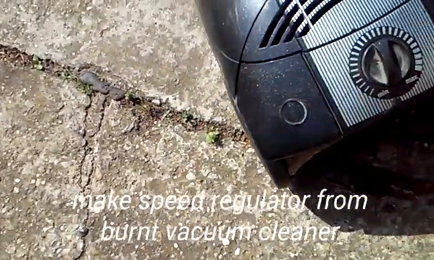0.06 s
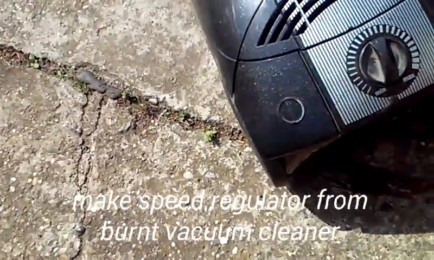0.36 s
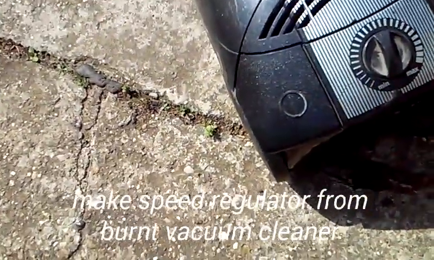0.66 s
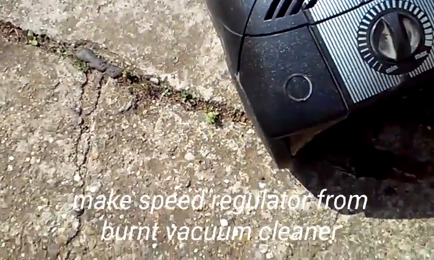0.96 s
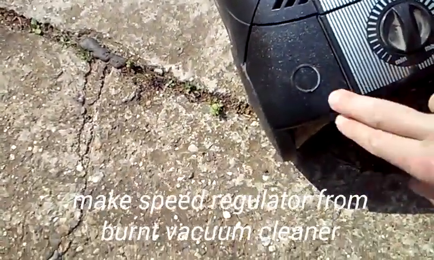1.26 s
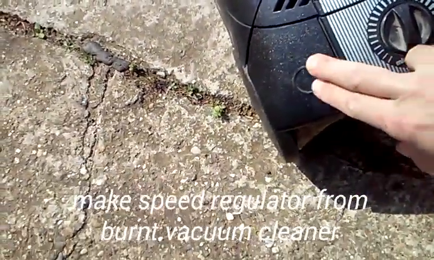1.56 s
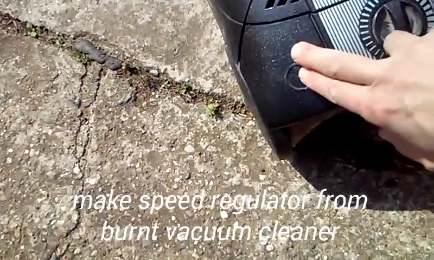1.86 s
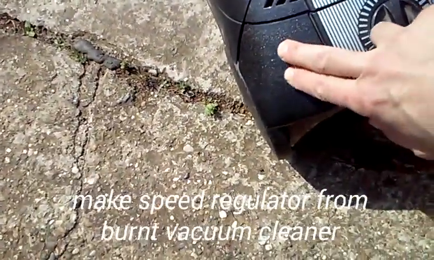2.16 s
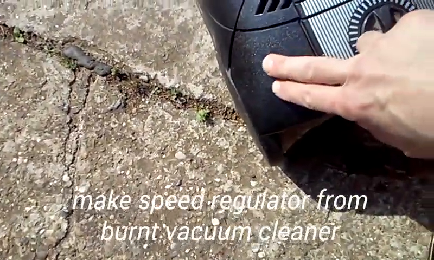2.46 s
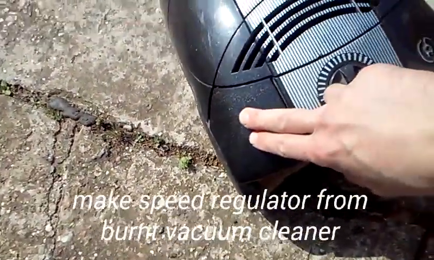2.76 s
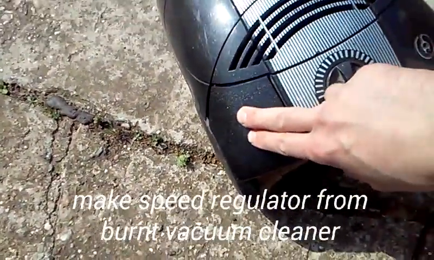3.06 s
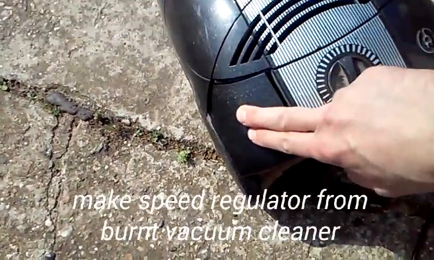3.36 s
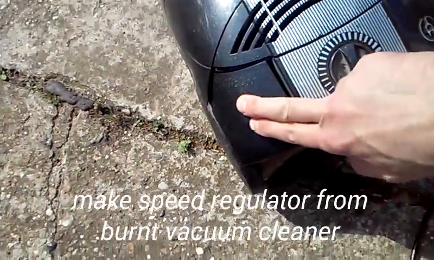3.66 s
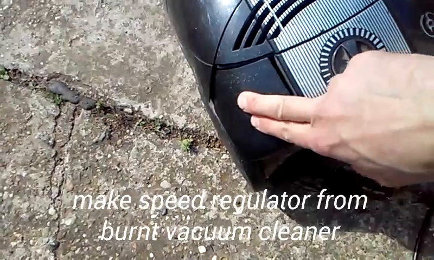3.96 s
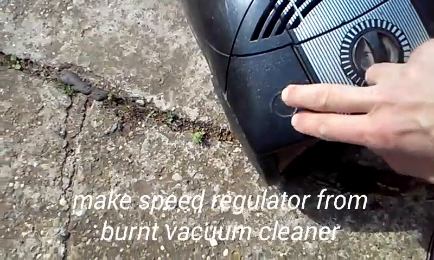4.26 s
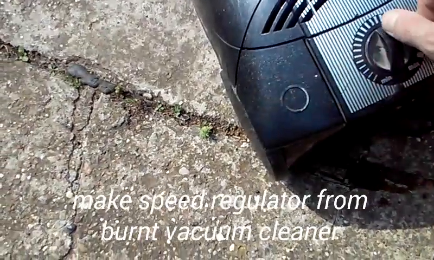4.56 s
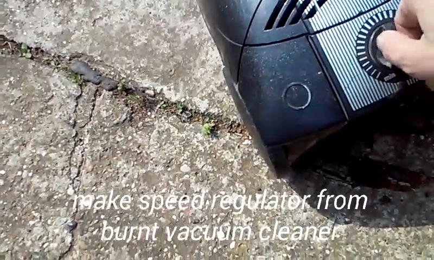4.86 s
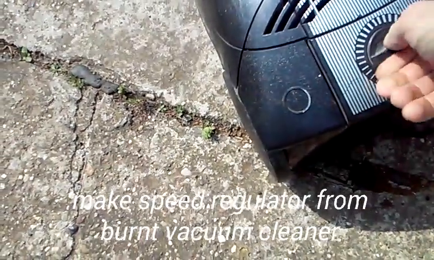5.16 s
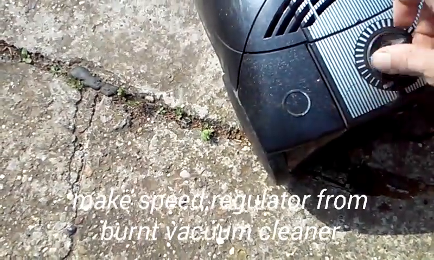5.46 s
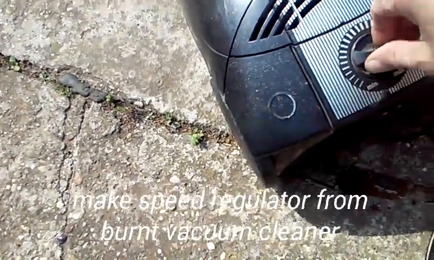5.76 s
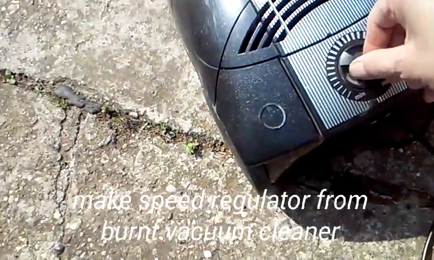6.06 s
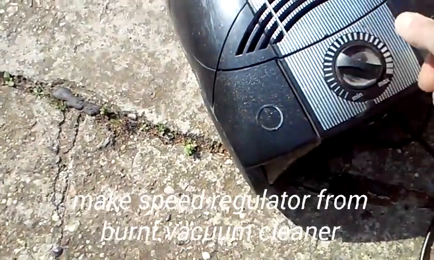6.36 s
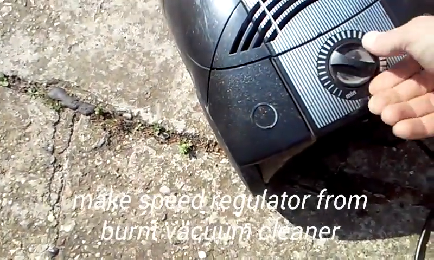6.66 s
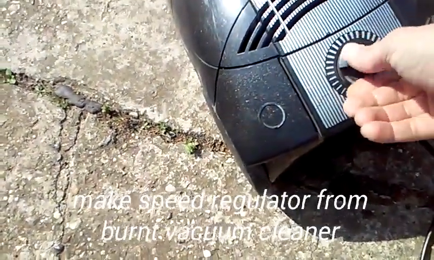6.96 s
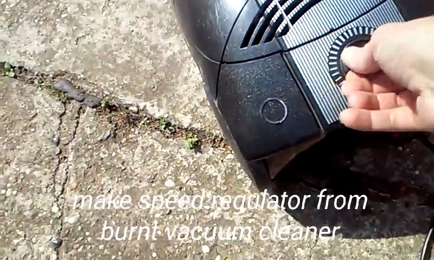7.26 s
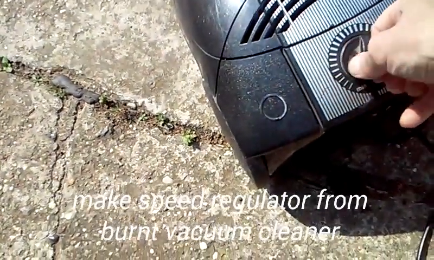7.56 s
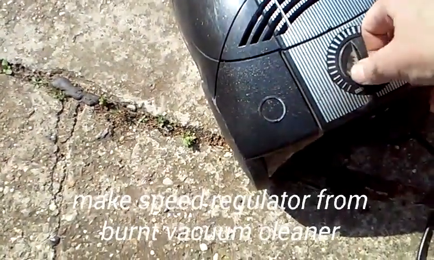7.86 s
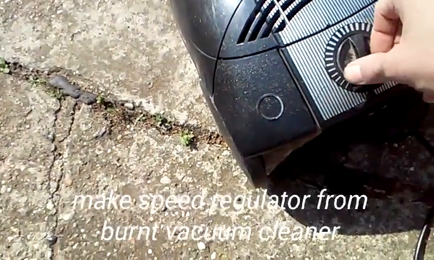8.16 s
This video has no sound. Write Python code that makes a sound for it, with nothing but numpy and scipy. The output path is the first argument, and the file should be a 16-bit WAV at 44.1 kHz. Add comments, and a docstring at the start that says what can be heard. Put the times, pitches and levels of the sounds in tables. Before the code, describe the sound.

An angle grinder with no load coasts down close by, its worn gears and bearings rattling more slowly and quietly, with brief squeaks and a run of knocks. As it nearly stops, power returns with a low growl and the motor climbs into a loud rasp of gears and air, with a hum and a high whine that rise, then ease slightly. Light wind bumps the single microphone outdoors.

```python
"""An angle grinder on a speed dial, running unloaded, outdoors and close to a single microphone.
It coasts down with its worn gears and bearings rattling and knocks a few times as it nearly stops.
Powered again, it climbs to a rasp of gear teeth and fan air, with an unbalance hum and a high
commutator whine. Light wind bumps the microphone, and a limiter catches the peaks."""
import sys
import numpy as np
from scipy import signal
from scipy.fft import rfft, irfft, next_fast_len
from scipy.io import wavfile
from scipy.ndimage import uniform_filter1d, minimum_filter1d, map_coordinates

SR = 44100
rng = np.random.default_rng(int(sys.argv[2]) if len(sys.argv) > 2 else 0)


def output_pcm(signal):
    """Save a mono or channel-first signal as 16-bit PCM at the path in sys.argv[1].

    Samples are clipped to [-1, 1] before scaling.
    """
    pcm = np.clip(np.atleast_2d(signal).T, -1, 1) * 32767
    wavfile.write(sys.argv[1], SR, np.round(pcm).astype(np.int16))


N = 370440
TIME = np.arange(N) / SR
POWER_ON_S, CATCH_S = 3.72, 4.05  # the dial lets the current in softly, then the motor catches
CRUISE_HZ, TOP_HZ = 400, 15850  # reference speed (motor turns per second); upper edge of the sound


def amp(db):
    """Decibels to gain."""
    return 10 ** (np.asarray(db) / 20)


def unit(x):
    """Scale to rms 1."""
    return x / np.sqrt(np.mean(x ** 2) + 1e-20)


def wobble(rate):
    """A smooth random curve of rms 1, rate knots a second."""
    return unit(map_coordinates(rng.standard_normal(int(N * rate / SR) + 4), [TIME * rate]))


def filtered(x, response):
    """Filter x by a gain given as a function of frequency."""
    size = next_fast_len(N + 8192)
    return irfft(rfft(x, size) * response(np.fft.rfftfreq(size, 1 / SR)), size)[:N]


def resonance(hz, centre_hz, width_hz):
    """A peak of height 1, width_hz wide at half height."""
    return 1 / (1 + (2 * (hz - centre_hz) / width_hz) ** 2)


def bell(centre_s, sigma_s):
    """The samples round centre_s, and a bell-shaped swell on them."""
    near = slice(max(0, int((centre_s - 4 * sigma_s) * SR)), int((centre_s + 4 * sigma_s) * SR))
    return near, np.exp(-((TIME[near] - centre_s) / sigma_s) ** 2 / 2)


def swells(rows):
    """Envelope of swells from rows of centre_s, level_db, sigma_s."""
    out = np.zeros(N)
    for centre_s, level_db, sigma_s in rows:
        near, shape = bell(centre_s, sigma_s)
        out[near] += amp(level_db) * shape
    return out


def by_speed(speed, level_db, slope_db):
    """Gain that is level_db at cruising speed and changes by slope_db with each doubling."""
    return amp(level_db + slope_db * np.log2(speed / CRUISE_HZ))


def slack(take_up_s=.09):
    """1 while the gears run loose, dying away once the motor pulls them tight."""
    return np.exp(-np.maximum(TIME - CATCH_S, 0) / take_up_s)


# Puffs of wind on the microphone: centre_s, level_db, sigma_s
WIND_PUFFS = [(.765, -35, 0.036), (1.04, -38, 0.037), (1.33, -41.5, 0.075), (1.7, -45, 0.035),
              (2.3, -47, 0.059), (2.67, -45, 0.086), (3.14, -48, .05), (3.985, -31, 0.013),
              (7.2, -44, 0.14), (7.61, -37, 0.038)]


def wind():
    """Low puffs on the microphone over a faint outdoor rumble."""
    rumble = filtered(rng.standard_normal(N), lambda hz: hz / (hz + 25) / (1 + (hz / 105) ** 3))
    return (swells(WIND_PUFFS) + amp(-59)) * unit(rumble)


def guard(speed):
    """The disc guard, shaken by the loose gears, holds one narrow ring that grows as they slow."""
    ring = filtered(rng.standard_normal(N), lambda hz: resonance(hz, 865, width_hz=90))
    return by_speed(speed, level_db=-45.5, slope_db=-3.5) * slack() * unit(ring)


def growl():
    """The chopped mains shake the motor a hundred times a second as it starts to pull."""
    kicks = 1 + .7 * np.sin(2 * np.pi * 100 * TIME)
    noise = rng.standard_normal(N)
    body = filtered(noise, lambda hz: hz ** 3 / (hz ** 3 + 160 ** 3) / (1 + (hz / 900) ** 4))
    return swells([(3.86, -34, .074), (4.07, -27.5, .079), (4.165, -26, .034)]) * unit(kicks * body)


# Dry bearings squealing at their resonances: centre_s, level_db, sigma_s, pitch_hz
BEARING_SQUEAKS = [(1.2, -27.5, 0.15, 2530), (1.25, -23, 0.061, 4930), (2.15, -25, 0.32, 5034),
                   (2.92, -26, 0.14, 2557), (4.12, -20.5, 0.072, 6240), (5.3, -15.5, 0.28, 3755),
                   (7.2, -20, 0.18, 5520), (7.5, -21, 0.028, 4073), (7.58, -17.5, 0.058, 7500),
                   (7.93, -21, 0.02, 3670)]
# Short chirps at a high housing resonance: centre_s, relative_db
HOUSING_CHIRPS = [(4.5585, -18), (4.796, -12), (4.8753, -13), (5.1994, -8), (5.2994, -11), (5.3737, -11),
                  (5.475, -15), (5.8915, -16), (7.621, -8), (8.2743, -16)]


def squeaks(gears, chirp_db=-4, chirp_sigma_s=.019, chirp_hz=12070):
    """Each squeak or chirp is a narrow band of noise that stutters with the blows of the gears."""
    force = np.abs(gears)
    stutter = np.abs(uniform_filter1d(force, 130)) / (np.abs(uniform_filter1d(force, 9000)) + 1e-9)
    grain = unit(stutter ** 1.5 * wobble(620)) + 1j * unit(stutter ** 1.5 * wobble(620))
    chirps = [(centre_s, db + chirp_db, chirp_sigma_s, chirp_hz) for centre_s, db in HOUSING_CHIRPS]
    out = np.zeros(N)
    for centre_s, level_db, sigma_s, pitch_hz in [*BEARING_SQUEAKS, *chirps]:
        near, shape = bell(centre_s, sigma_s)
        band = np.real(grain[near] * np.exp(2j * np.pi * pitch_hz * TIME[near]))
        out[near] += amp(level_db) * shape * band
    return out


# Moments when one shaft harmonic swells or fades: centre_s, harmonic, change_db, sigma_s
HARMONIC_SWELLS = [(.88, 1, -8, .08), (2.2, 1, -10, .25), (4.66, 4, 4, .05), (8.3, 4, 8, .11),
                   (.65, 24, -7, .15), (4.73, 24, -7, .1), (5.26, 24, -8, .06), (5.5, 24, 4, .08),
                   (5.85, 24, -6, .06), (6.14, 24, -6, .05), (6.55, 24, 4, .2), (7.17, 24, -14, .09),
                   (8.38, 24, -15, .11)]


def partial(angle, harmonic, roughness, width_hz):
    """One harmonic of the turning shaft, blurred into narrow noise by its roughness."""
    phase = harmonic * angle
    blur = roughness * (wobble(width_hz) * np.sin(phase) + wobble(width_hz) * np.cos(phase))
    swell_db = sum(change_db * swells([(centre_s, 0, sigma_s)])
                   for centre_s, k, change_db, sigma_s in HARMONIC_SWELLS if k == harmonic)
    return amp(swell_db) * (np.sqrt(2) * np.sin(phase) + blur) / np.sqrt(1 + roughness ** 2)


def hum(speed, angle):
    """Unbalance shakes the tool once a turn, swelling as it passes through a body resonance."""
    level_db = -40 + 14 * resonance(speed, 345, width_hz=75)
    return by_speed(speed, level_db, slope_db=13) * partial(angle, 1, roughness=.21, width_hz=25)


# Main tones of the fan: harmonic, level_db, slope_db_per_doubling, roughness, width_hz
FAN_TONES = [(4, -30, 10.5, 0.52, 50), (5, -30, 15.5, 1, 60)]
# Weaker tones of the fan: harmonic, relative_db
FAN_OVERTONES = [(2, -5.5), (3, -4), (6, -9), (7, -8)]


def fan(speed, angle, overtone_db=-31.5, overtone_slope_db=12, flutter_db=2):
    """The fan sings on multiples of the shaft speed, each tone coming and going."""
    weak = [(harmonic, overtone_db + db, overtone_slope_db, 1, 60) for harmonic, db in FAN_OVERTONES]
    tones = np.zeros(N)
    for harmonic, level_db, slope_db, roughness, width_hz in [*FAN_TONES, *weak]:
        level = by_speed(speed, level_db + flutter_db * wobble(8), slope_db)
        tones += level * partial(angle, harmonic, roughness, width_hz)
    draught = np.clip(speed / 350, 0, 1) ** 3.5  # a slow fan moves little air
    return draught * tones


def whine(speed, angle, onset_hz=255):
    """The commutator's flickering whine, 24 cycles a turn, dies away at speeds below onset_hz."""
    level = by_speed(speed, level_db=-21, slope_db=7.5) / (1 + (onset_hz / speed) ** 16)
    flicker = amp(2 * wobble(28))
    return level * flicker * partial(angle, 24, roughness=.6, width_hz=200)


def howl(speed, angle, idle_db=-32, pull_db=-12.5, pull_hz_per_s=400):
    """The meshing teeth howl through the gear case resonance, most when the motor speeds up."""
    pull = uniform_filter1d(np.maximum(np.gradient(speed) * SR, 0), size=6000) / pull_hz_per_s
    pull *= np.clip((TIME - CATCH_S) / .2, 0, 1)  # the teeth bear only once the motor has caught
    case = resonance(12 * speed, 3030, width_hz=1200)
    return case * (amp(idle_db) + amp(pull_db) * pull) * partial(angle, 12, roughness=5, width_hz=520)


def housing(x, colour, modes, mode_speeds, speed):
    """The housing colours x; the speed decides how strongly each resonance is driven."""
    hz = np.linspace(1, TOP_HZ, 2048)
    colour_hz, colour_db = np.transpose(colour)
    base_db = np.interp(np.log(hz), np.log(colour_hz), colour_db)
    out = np.zeros(N)
    for k, selector in enumerate(np.eye(len(mode_speeds))):
        peaks_db = sum(db[k] * resonance(hz, pitch_hz, width_hz) for pitch_hz, width_hz, *db in modes)
        gain = unit(amp(base_db + peaks_db))
        crossfade = np.interp(speed, mode_speeds, selector)
        out += crossfade * filtered(x, lambda f: np.interp(f, hz, gain))
    return out


def blows(times, sizes, attack_s, t60_s):
    """Power envelope of blows that rise fast and die away."""
    t = np.arange(SR // 8) / SR
    train = np.bincount(np.clip(times * SR, 0, N).astype(int), sizes ** 2, N + 1)
    blow = (1 - np.exp(-t / attack_s)) * amp(-60 * t / t60_s)
    return np.abs(signal.fftconvolve(train, blow ** 2)[:N])


def chatter(speed, per_turn, scatter, spread_db, t60_s):
    """Power envelope, mean about 1, of uneven blows that come per_turn times a motor turn."""
    cycles = np.cumsum(speed * per_turn) / SR
    timing, strength = rng.standard_normal((8000, 2))[:int(cycles[-1])].T
    times = np.interp(np.arange(len(timing)) + scatter * timing, cycles, TIME)
    power = blows(times, amp(spread_db * np.tanh(strength)), attack_s=.0016, t60_s=t60_s)
    return power / (uniform_filter1d(power, SR // 4) + 1e-9)


# Hard knocks of the gears in their play: start_s, relative_db
GEAR_KNOCKS = [(1.2082, -8), (1.2476, -8), (1.29, -15), (1.4112, -1), (1.9565, -3), (2.0235, -0.5),
               (2.0607, -1.5), (2.0946, 1.5), (2.133, -0.5), (2.1697, -0.5), (2.2423, -0.5), (2.3212, 0.5),
               (2.357, 1), (2.4344, 0.5), (2.4828, -1), (3.3837, -4), (3.921, -2), (3.9858, 0), (4.054, -2),
               (4.126, -8)]
# A few short rubs as the motor nearly stops, about one per lap of the bearing cage:
# centre_s, level_db, sigma_s
NEAR_STOP_RUBS = [(3.603, -14, .005), (3.662, -9.5, .004), (3.719, -8.5, .005), (3.745, -20, .012)]
# Colour of the coasting tool, close up: frequency_hz, gain_db
COAST_COLOUR = [(40, -16), (200, -21.5), (400, -8), (700, -5.5), (1300, -1), (2000, -4.5), (4000, -4),
                (6000, -6), (9000, -5), (13000, -3.5), (15800, -21)]
# Motor speeds for the coasting resonances: speed_hz
COAST_SPEEDS = [75, 165, 300]
# Housing resonances while coasting: pitch_hz, width_hz, then gain_db at each of COAST_SPEEDS
COAST_MODES = [(410, 154, -5, -10, -2.5), (710, 450, -0.5, 2, -5.5), (1387, 700, -18, -8.5, -6),
               (1780, 160, 8.5, 1, -4), (2317, 420, 6, 10, 7.5), (2837, 120, 1.5, 11, 3.5),
               (3180, 210, 10, 0, 4), (3500, 240, -1, 1, 10.5), (4240, 290, 1, 3.5, 12),
               (4860, 460, 6, 18, 5), (6715, 170, -1, 0, -12), (7750, 1200, -0.5, 2.5, 2),
               (8025, 490, 15.5, 8.5, -2), (11950, 390, 10.5, 12.5, 11), (12300, 320, 6.5, 7, 13),
               (13100, 180, 0, -5, -6), (14570, 580, 9, 20, 17)]


def rattle(speed, stall_hz=58.4, clatter_db=-19, knock_db=-3, rolling_db=-31):
    """The loose bearing cage hits once a lap, the spindle once a turn, amid rebounds, rubs and knocks."""
    cage = chatter(speed, per_turn=.375, scatter=.1, spread_db=3, t60_s=.019)
    rebounds = chatter(speed, per_turn=1.5, scatter=.3, spread_db=5, t60_s=.011)
    spindle = chatter(speed, per_turn=.1875, scatter=.08, spread_db=3, t60_s=.028)
    spindle_share = np.interp(speed, [110, 280], [.1, .65])
    hits = (1 - spindle_share) * cage + spindle_share * spindle
    hit_share = np.interp(speed, [80, 180], [.2, .6])
    clatter = hit_share * hits + (1 - hit_share) * rebounds
    knock_s, relative_db = np.transpose(GEAR_KNOCKS)
    knocks = blows(knock_s, amp(relative_db + knock_db), attack_s=.001, t60_s=.028)
    # the gears fly free across their play just before a knock
    contact = 1 - np.clip(swells([(s - .006, -.5, .007) for s in knock_s]), 0, 1)
    smear = np.interp(speed, [90, 170], [.25, .04])
    texture = contact * (1 - smear) * clatter + smear
    tumbling = np.interp(speed - stall_hz, [-1.5, 0], [.12, 1])
    # the first current nudges the gears and steadies them
    nudge_s = [POWER_ON_S, POWER_ON_S + .01, CATCH_S - .2, CATCH_S - .05]
    steadied = np.interp(TIME, nudge_s, [1, .52, .52, 1])
    shaking = np.hypot(by_speed(speed, level_db=-8.5, slope_db=8), amp(clatter_db))
    level = shaking * tumbling * steadied * slack()
    bearing_hiss = amp(rolling_db) * slack()
    power = level ** 2 * texture + knocks + swells(NEAR_STOP_RUBS) ** 2 + bearing_hiss ** 2
    noise = np.sqrt(power) * rng.standard_normal(N)
    return housing(noise, COAST_COLOUR, COAST_MODES, COAST_SPEEDS, speed)


# Colour of the powered tool, close up: frequency_hz, gain_db
POWERED_COLOUR = [(40, -28), (120, -22.5), (220, -17), (400, -10), (1000, -3.5), (2000, -2), (3200, 6),
                  (5000, -2), (8000, -2.5), (11000, -4.5), (13000, -7.5), (15800, -9)]
# Motor speeds for the powered resonances: speed_hz
POWERED_SPEEDS = [171, 360, 435, 466]
# Gear case and vent resonances: pitch_hz, width_hz, then gain_db at each of POWERED_SPEEDS
POWERED_MODES = [(700, 440, 6.5, 0.5, 3.5, 1.5), (1350, 370, 6.5, 4.5, 4, 5.5),
                 (1800, 550, -7, -2, -1.5, 0), (2170, 280, 5, 3.5, 6.5, 5), (2620, 150, -5, -0.5, 0.5, -5),
                 (3170, 200, 4, -6.5, 0.5, -4.5), (4110, 400, 10, 3.5, -2.5, 5.5),
                 (4630, 580, 8, 3.5, -0.5, 0), (5320, 740, 3, -7, 0.5, -3), (6250, 390, 5, 2.5, 6, 2),
                 (7830, 710, -10, 1.5, -2, 2), (8600, 1100, 3.5, -5, 2.5, -3), (10100, 6000, -1, 0, 2.5, 6),
                 (11995, 420, 10, 5.5, 7.5, 5)]


def rasp(speed, soft_start_db=-20, rise_db_per_s=29):
    """Under power, separate gear blows merge into a rush of teeth and fan air as the speed climbs."""
    teeth = chatter(speed, per_turn=1.1, scatter=.3, spread_db=6, t60_s=.014)
    teeth_share = np.interp(speed, [120, 300, 450], [.8, .6, .3])
    judder_db = teeth_share * (1.1 * wobble(45) + 1.9 * wobble(170))
    start_db = np.where(TIME < CATCH_S, soft_start_db + rise_db_per_s * (TIME - POWER_ON_S), 0)
    stumble_db = -9 * swells([(4.116, 0, .008)])  # the motor misses just after catching
    level = by_speed(speed, level_db=-10, slope_db=1.5) * (TIME > POWER_ON_S)
    level *= amp(start_db + stumble_db + judder_db)
    rush = level * np.sqrt(teeth_share * teeth + 1 - teeth_share) * rng.standard_normal(N)
    return housing(rush, POWERED_COLOUR, POWERED_MODES, POWERED_SPEEDS, speed)


def swirl(x, depth_db):
    """Paths round the moving hand to the microphone shift, so patches of the spectrum swell and sink."""
    spectrum = signal.stft(x, nperseg=512)[2]
    patches = rng.standard_normal(spectrum.shape)
    for _ in range(2):
        patches = uniform_filter1d(uniform_filter1d(patches, size=4, axis=0), size=36, axis=1)
    return signal.istft(spectrum * amp(depth_db * unit(patches)), nperseg=512)[1][:N]


# Motor speed under power, as the dial is turned: time_s, speed_hz
DIAL_SPEEDS = [(4.0, 104), (4.18, 195), (4.42, 278), (4.66, 343), (5.119, 370), (5.381, 364), (5.72, 400),
               (5.999, 412.7), (6.32, 447), (6.7, 452.0), (7.1, 468), (7.48, 464), (7.85, 454), (8.4, 417)]


def shaft_speed(first_hz=310.9, drag_s=5.0, friction_hz_per_s=38):
    """Turns per second: air drag and bearing friction slow the motor, then it follows the dial."""
    friction_hz = friction_hz_per_s * drag_s
    coast = (first_hz + friction_hz) * np.exp(-TIME / drag_s) - friction_hz
    restart_hz = np.interp(POWER_ON_S, TIME, coast)
    time_s, speed_hz = np.transpose([(POWER_ON_S, restart_hz), *DIAL_SPEEDS])
    return np.where(TIME < POWER_ON_S, coast, np.interp(TIME, time_s, speed_hz))


def scene():
    """One shaft speed plays the whole tool; the one close microphone feeds both channels."""
    speed = shaft_speed()
    gears = swirl(rattle(speed) + rasp(speed), depth_db=1.4)
    unsteady_speed = speed * (1 + .001157 * wobble(40))
    angle = 2 * np.pi * np.cumsum(unsteady_speed) / SR
    tones = hum(speed, angle) + fan(speed, angle) + whine(speed, angle) + howl(speed, angle)
    mono = gears + tones + guard(speed) + growl() + squeaks(gears) + wind()
    return np.array([mono, mono])


def record(dry, ceiling=.95):
    """The recorder's fast limiter holds down the peaks; nothing above TOP_HZ is kept."""
    needed = np.minimum(1, ceiling / (np.abs(dry).max(axis=0) + 1e-9))
    gain = uniform_filter1d(minimum_filter1d(needed, size=41), size=41)
    return np.array([filtered(x * gain, lambda hz: hz < TOP_HZ) for x in dry])


dry = scene()
out = record(dry)
output_pcm(out)
```